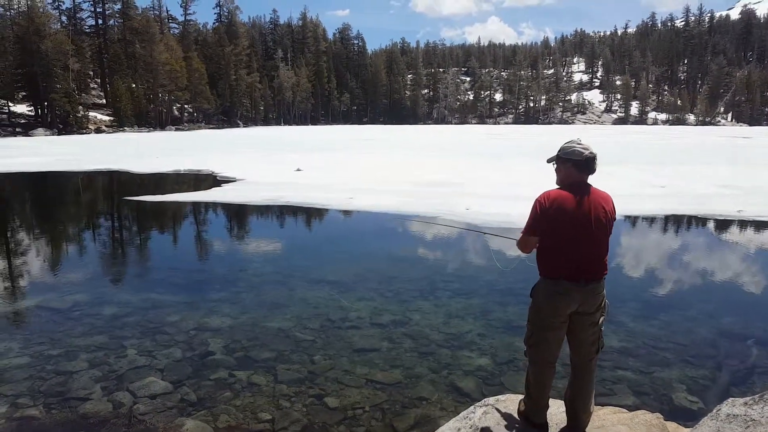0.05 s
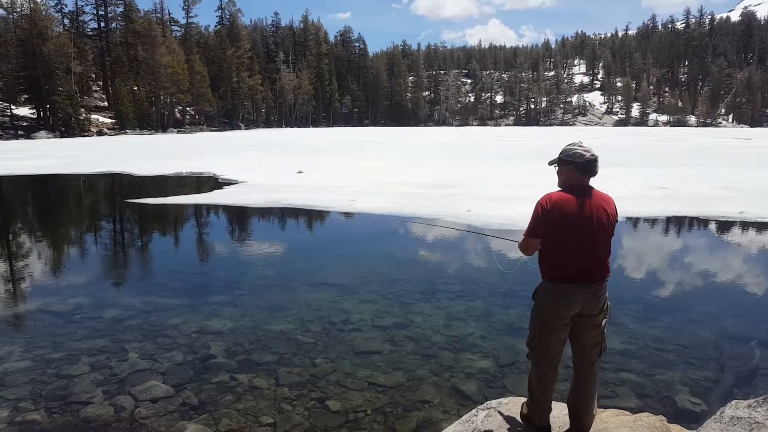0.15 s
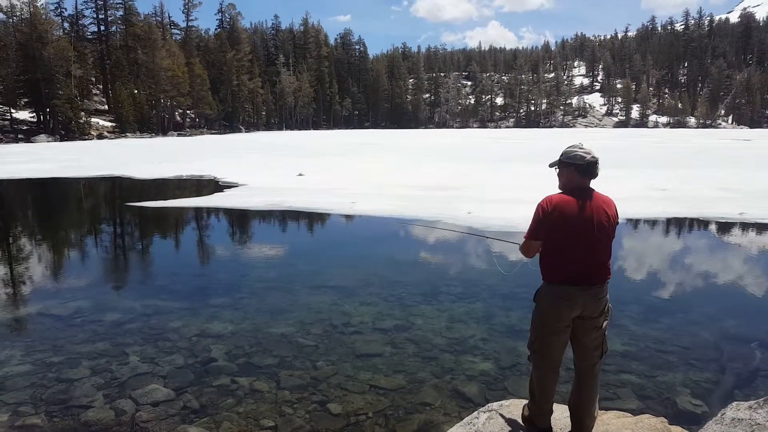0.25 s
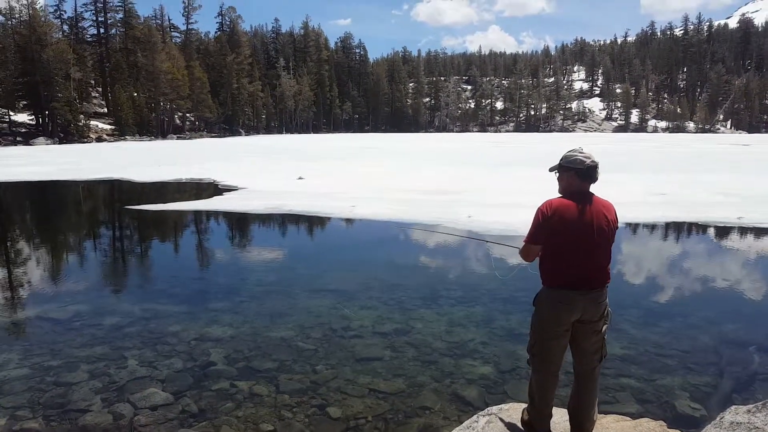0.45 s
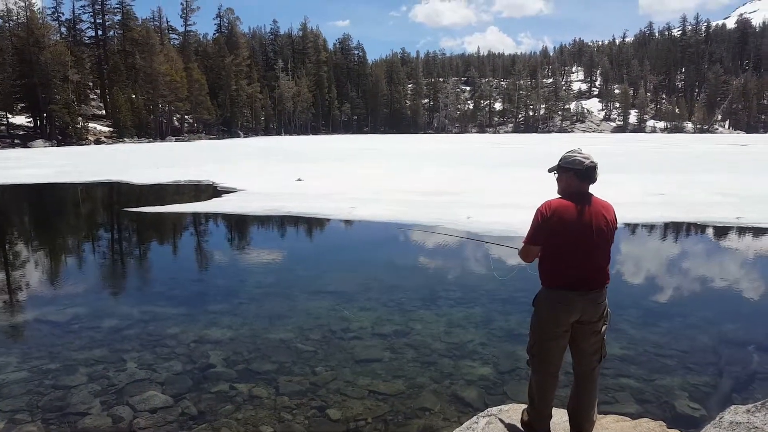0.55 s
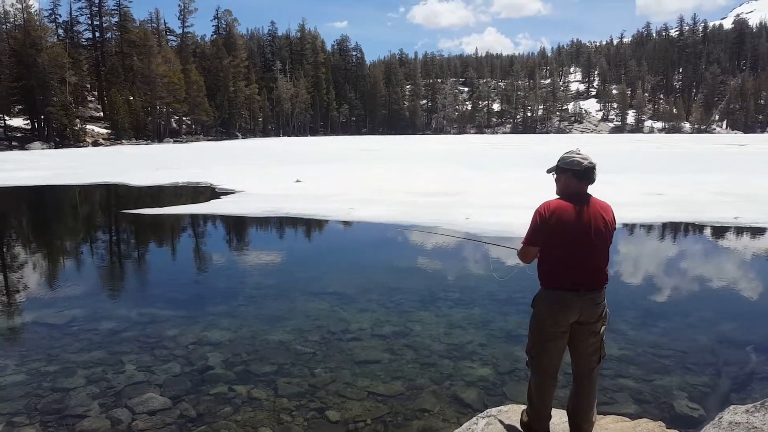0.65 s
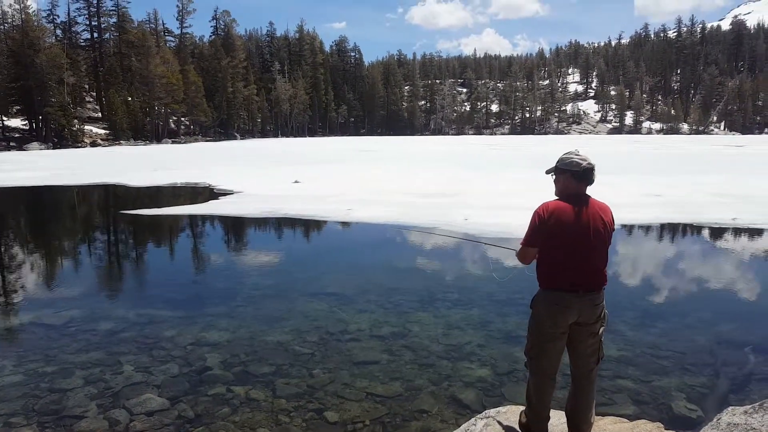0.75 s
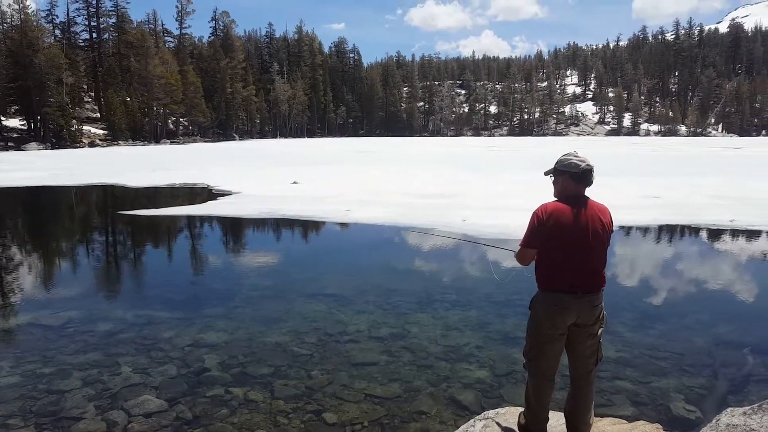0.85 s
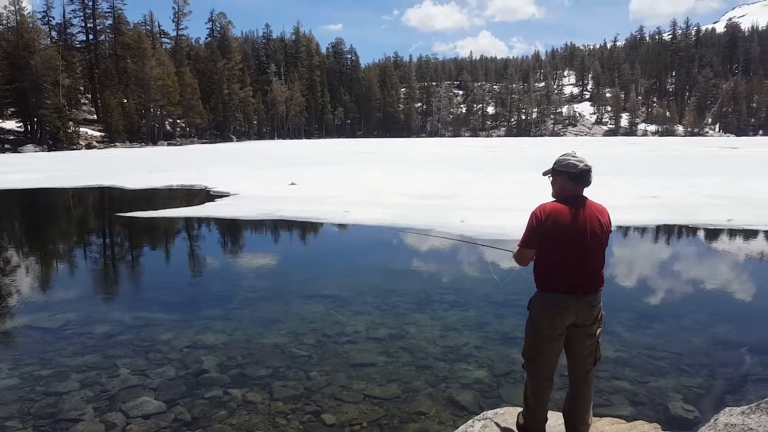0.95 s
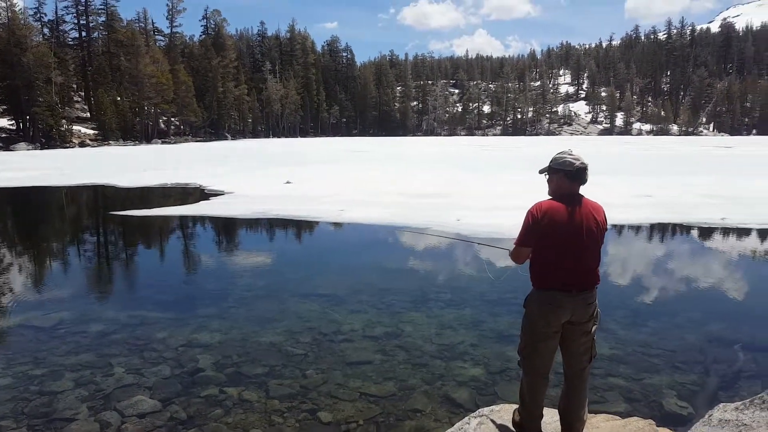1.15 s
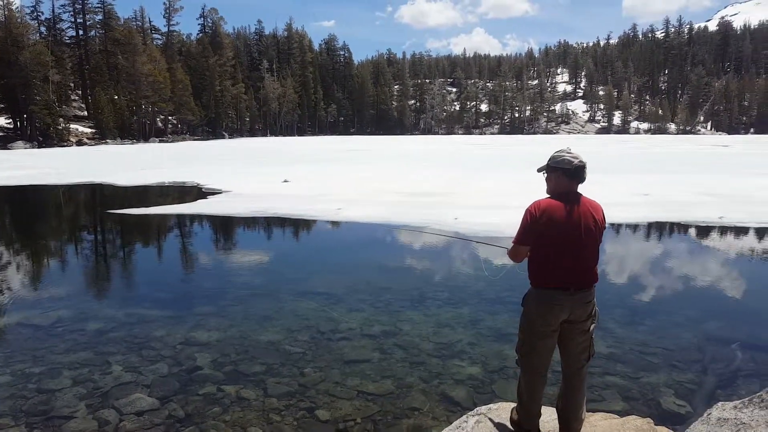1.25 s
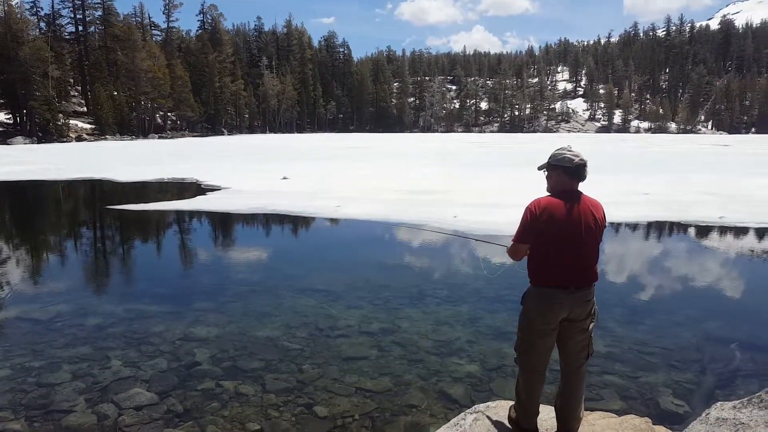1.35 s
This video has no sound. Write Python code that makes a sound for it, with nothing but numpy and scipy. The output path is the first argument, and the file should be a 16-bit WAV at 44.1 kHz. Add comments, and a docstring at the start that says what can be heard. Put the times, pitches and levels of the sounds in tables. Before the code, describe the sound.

Light, flickering wind blows on a hand-held camera's microphone beside a still lake, mostly at right, over soft hiss and a faint, thin, steady whine. At 0.24 s a finger knocks the casing with a short, crackly thump. Low buffeting gusts follow from 0.3 s, small ticks from 0.66 s. Around 0.93-1.09 s the grip rubs with soft bumps and a tiny squeak; fainter rubbing returns near 1.24-1.4 s.

```python
"""A hand-held camera by a still mountain lake, heard at its left and right microphone ports, mostly the right.
Noise hiss, low air, a thin sine whine and a flickering rush of wind run throughout.
Near 0.24 s a finger knocks the casing: short forces ring the body modes under a crackle of noise.
Lumpy buffeting follows the gusts from 0.3 s; from 0.66 s bright noise ticks snap.
From 0.93 s the grip slides: slips ring the casing, with soft bumps and one short squeak near 1.06 s."""
import sys
import numpy as np
from scipy import signal
from scipy.fft import rfft, irfft
from scipy.io import wavfile

SR = 44100
rng = np.random.default_rng(int(sys.argv[2]) if len(sys.argv) > 2 else 0)


def to_wav(sig):
    """Store sig (one row per channel, or 1-D mono) as 16-bit WAV at the path in sys.argv[1].

    Samples outside -1..1 are clipped; the rate is SR.
    """
    pcm = np.clip(np.atleast_2d(sig), -1, 1) * 32767
    pcm = np.round(pcm).astype(np.int16)
    wavfile.write(sys.argv[1], SR, pcm.T)  # frames by channels


N = 61739


def amp(db):
    """Decibels to linear gain."""
    return 10 ** (np.asarray(db) / 20)


def rms_one(x):
    """Scale a sound to an RMS of 1."""
    return x / np.sqrt(np.mean(x ** 2) + 1e-20)


def right(x, left_db):
    """Place a sound in the right port, with the left port at left_db relative to it."""
    return np.array([amp(left_db) * x, x])


def swell(start_s, length_s):
    """A half-sine bump of height 1."""
    progress = (np.arange(N) / SR - start_s) / length_s
    return np.sin(np.pi * np.clip(progress, 0, 1))


def level_curve(time_s, level_db):
    """Gain gliding in dB between points: practically silent before the first, held after the last."""
    return amp(np.interp(np.arange(N) / SR, time_s, level_db, left=-120))


def drift(rate_hz):
    """Slow random wander of RMS 1: white noise through a two-pole lowpass."""
    r = np.exp(-2 * np.pi * rate_hz / SR)
    noise = rng.standard_normal(N + SR)
    # the first second lets the filter settle
    return rms_one(signal.lfilter([1], [1, -2 * r, r * r], noise)[SR:])


def coloured(spectrum, patchy_db=0, rate_hz=12):
    """Noise shaped to a spectrum in dB per Hz; patchy_db makes each octave flicker on its own."""
    hz = np.maximum(np.arange(N // 2 + 1) * SR / N, 1)
    points_hz, points_db = np.transpose(spectrum)
    curve_db = np.interp(np.log(hz), np.log(points_hz), points_db, left=-200, right=-200)
    # the root brings white noise to unit power per Hz
    shaped = rfft(rng.standard_normal(N)) * amp(curve_db) * np.sqrt(SR / 2)
    if not patchy_db:
        return irfft(shaped, N)
    octave = np.log2(hz / 30)
    out = np.zeros(N)
    for k in range(-1, 10):
        # triangular octave bands that overlap and add up to 1
        band = irfft(shaped * np.clip(1 - abs(octave - k), 0, 1), N)
        out += amp(patchy_db * drift(rate_hz)) * band
    return out


def ring(clicks, hz, t60_s):
    """Two-pole resonator: a unit click starts a sine of height 1 that falls 60 dB in t60_s."""
    r = amp(-60 / (t60_s * SR))
    w = 2 * np.pi * hz / SR
    return signal.lfilter([0, np.sin(w)], [1, -2 * r * np.cos(w), r * r], clicks + 1e-18)


def push(start_s, size, contact_ms):
    """A half-sine contact force whose samples add up to size."""
    force = swell(start_s, contact_ms / 1000)
    return size * force / force.sum()


# modes of the camera body: pitch_hz [Hz], level_db [dB], t60_s [s]
BODY_MODES = [(85.7, -29.5, 0.093), (140.4, -4.5, 0.02), (292, -1.5, 0.013), (525, -19, 0.021),
              (624, -15.5, 0.051), (800, -14, 0.018), (1110, -28.5, 0.058), (1870, -45, 0.025)]


def body(force):
    """A force rings every mode of the camera body."""
    return sum(amp(level_db) * ring(force, pitch_hz, t60_s) for pitch_hz, level_db, t60_s in BODY_MODES)


# hiss and distant air, independent in the two ports: pitch_hz [Hz], level_db_per_hz [dB per Hz]
HISS = [(20, -85.5), (45, -94), (100, -96.5), (180, -100), (300, -102), (1000, -106), (3000, -112),
        (5000, -117), (7000, -121), (9500, -124), (12000, -119.5), (14000, -117), (17000, -115)]
# low air sound common to both ports: pitch_hz [Hz], level_db_per_hz [dB per Hz]
SHARED_AIR = [(25, -108), (70, -99), (170, -96), (350, -108), (800, -125)]


def air():
    """Steady noise: a separate hiss for each port over one shared low air sound."""
    hiss = np.array([coloured(HISS), coloured(HISS)])
    return hiss + coloured(SHARED_AIR)


WHINE_HZ, WHINE_WANDER_HZ = 1365.5, 2.7
WHINE_DB = -72  # RMS


def whine():
    """A thin sine whose pitch wavers slightly at random."""
    hz = WHINE_HZ + WHINE_WANDER_HZ * drift(7.3)
    tone = np.sqrt(2) * np.sin(2 * np.pi * np.cumsum(hz) / SR)
    return right(amp(WHINE_DB) * tone, -42.5)


# steady rush of air in the right port: pitch_hz [Hz], level_db_per_hz [dB per Hz]
RUSH = [(20, -83), (42, -78.5), (65, -90), (150, -92), (300, -97.5), (600, -94.5), (1000, -94.5),
        (1400, -95), (1900, -100), (2600, -105), (3200, -113), (5000, -119), (9000, -130)]
RUSH_PATCHY_DB = 2.05


def rush():
    """Wind noise in the right port only, each octave flickering around a constant level."""
    flow = coloured(RUSH, RUSH_PATCHY_DB)
    return np.array([np.zeros(N), flow])


# gust strength at the right port: time_s [s], level_db [dB]
GUSTS = [(.3, -74.5), (.45, -72), (.5, -69.5), (.55, -81), (.64, -65), (.68, -68), (.74, -75), (.81, -82),
         (.835, -56), (.875, -56), (.9, -82), (.955, -75), (.97, -57.5), (1.01, -62), (1.055, -51.5),
         (1.078, -68), (1.16, -78), (1.185, -65), (1.22, -75), (1.265, -69.5), (1.285, -57.5), (1.31, -67),
         (1.33, -68), (1.4, -62)]
# tone of the buffeting: pitch_hz [Hz], level_db [dB, relative]
BUFFET_TONE = [(25, -17), (70, 5), (130, -1.5), (250, -15.5), (500, -19), (1000, -49)]
BUFFET_LUMPY_DB, BUFFET_LEFT_DB = 2, -14


def buffeting():
    """Lumpy low wind noise that follows the gusts, independent in each port and weaker at left."""
    gust = level_curve(*np.transpose(GUSTS))
    left_rumble, right_rumble = [
        gust * rms_one(coloured(BUFFET_TONE, BUFFET_LUMPY_DB, 18)) for _ in range(2)]
    return np.array([amp(BUFFET_LEFT_DB) * left_rumble, right_rumble])


# soft bumps of the grip: start_s [s], strength_db [dB], left_minus_right_db [dB]
BUMPS = [(0.968, -43, -26), (1.054, -35.5, -17), (1.0605, -52.5, 15), (1.175, -39, -39), (1.287, -36, -31)]
BUMP_CONTACT_MS = 4.3


def bumps():
    """Soft pushes of the hand ring the body modes."""
    out = np.zeros((2, N))
    for start_s, strength_db, left_minus_right_db in BUMPS:
        force = push(start_s, -amp(strength_db), BUMP_CONTACT_MS)
        out += right(body(force), left_minus_right_db)
    return out


# ticks of the casing: start_s [s], peak_db [dB], centre_hz [Hz], low_ring_db [dB]
TICKS = [(0.656, -58.5, 6500, -84), (.742, -58, 4800, -84), (.896, -62, 7000, -82), (1.041, -62, 6000, -65),
         (1.076, -51.5, 5500, -50), (1.097, -60, 4960, -75), (1.117, -56, 5200, -84),
         (1.125, -58, 6400, -80), (1.147, -55, 4800, -94), (1.156, -58, 6500, -83), (1.216, -59, 4830, -81),
         (1.246, -54, 3930, -78), (1.296, -65, 5000, -75), (1.3231, -48.5, 4540, -37),
         (1.3848, -57, 5700, -79)]
TICK_T60_S, TICK_WIDTH_OCTAVES, TICK_LEFT_DB = .007, 1.0, -18
TICK_SNAP = 4  # height of the first push, in units of the noise's RMS at its start
TICK_RING_HZ, TICK_RING_T60_S = 820, 0.0089


def ticks():
    """A first push and dying noise pass a band filter; a click rings the casing lower down."""
    bursts, clicks = np.zeros(N + SR), np.zeros(N)
    t = np.arange(SR // 50) / SR
    for start_s, peak_db, centre_hz, low_ring_db in TICKS:
        noise = rng.standard_normal(len(t)) * amp(-60 * t / TICK_T60_S)
        snap = TICK_SNAP * (t == 0)
        edges_hz = centre_hz * 2. ** (TICK_WIDTH_OCTAVES * np.array([-.5, .5]))
        edges_hz = np.clip(edges_hz, 10, .45 * SR)
        band = signal.butter(2, edges_hz, "band", fs=SR, output="sos")
        burst = signal.sosfilt(band, noise + snap)
        start = int(start_s * SR)
        bursts[start:][:len(t)] += amp(peak_db) * burst / abs(burst).max()
        clicks[start] = amp(low_ring_db)
    low_ring = ring(clicks, TICK_RING_HZ, TICK_RING_T60_S)
    return right(bursts[:N] + low_ring, TICK_LEFT_DB)


SQUEAK_PEAK_S, SQUEAK_HALF_LENGTH_S, SQUEAK_DB = 1.058, .007, -56
SQUEAK_HZ, SQUEAK_T60_S = 2600, .012


def squeak():
    """Noise through one narrow resonance, swelling briefly within the slide."""
    tone = rms_one(ring(rng.standard_normal(N), SQUEAK_HZ, SQUEAK_T60_S))
    shape = swell(SQUEAK_PEAK_S - SQUEAK_HALF_LENGTH_S, 2 * SQUEAK_HALF_LENGTH_S)
    return amp(SQUEAK_DB) * shape * tone


# two strokes of the sliding grip, one list each: time_s [s], level_db [dB], favoured_hz [Hz]
SLIDE_STROKES = [
    [(.93, -64.5, 450), (.965, -60, 450), (1.0, -53, 485), (1.018, -54, 1530), (1.032, -48.5, 720),
     (1.046, -50.5, 1180), (1.055, -52, 2580), (1.063, -49, 1030), (1.076, -58.5, 1140), (1.086, -72, 1210)],
    [(1.24, -67, 596), (1.27, -62, 587), (1.298, -56.5, 800), (1.314, -60, 875), (1.34, -62, 990),
     (1.39, -65, 600)],
]
# resonances of the casing under a sliding finger: pitch_hz [Hz], level_db [dB, relative], t60_s [s]
SKIN_RESONANCES = [(450, -7, 0.028), (757, -2, 0.015), (1026, -6.5, 0.0067), (1150, 0, 0.015),
                   (1280, -5, 0.012), (1600, -8, 0.028), (2320, -10.5, 0.0039), (2880, -7, 0.002),
                   (3800, -17, 0.0017), (5200, -10, 0.0013), (7000, -19.5, 0.0029)]
SLIPS_PER_S, SLIP_SPREAD_DB = 4000, 3
FAVOUR_DB, FAVOUR_OCTAVES = 9.5, 0.23
SLIDE_LEFT_DB = -24


def slide():
    """Dense uneven slips, each dealt to one resonance; the moving finger favours one region."""
    time_s, level_db, favoured_points_hz = np.transpose(SLIDE_STROKES[0] + SLIDE_STROKES[1])
    gain = level_curve(time_s, level_db)  # stays faintly open between the strokes
    favoured_hz = np.interp(np.arange(N) / SR, time_s, favoured_points_hz)

    happens = rng.random(N) < SLIPS_PER_S / SR
    size = amp(SLIP_SPREAD_DB * np.minimum(rng.exponential(1, N), 3))
    slips = happens * size * rng.choice([-1, 1], N)
    dealt = rng.integers(0, len(SKIN_RESONANCES), N)

    out = squeak()
    for k, (pitch_hz, skin_db, t60_s) in enumerate(SKIN_RESONANCES):
        near = np.exp(-(np.log2(pitch_hz / favoured_hz) / FAVOUR_OCTAVES) ** 2)
        tone = rms_one(ring(slips * (dealt == k), pitch_hz, t60_s))
        out += gain * amp(skin_db + FAVOUR_DB * (near - 1)) * tone
    return right(out, SLIDE_LEFT_DB)


# tone of the crackle: pitch_hz [Hz], level_db [dB, relative]
CRACKLE_TONE = [(200, -5), (600, 5), (1500, -5.5), (2500, -13), (3500, -28.5), (5500, -34), (7700, -34.5),
                (9500, -48.5)]
CRACKLE_START_S, CRACKLE_LENGTH_S, CRACKLE_DB = .2362, 0.017, -39.5


def crackle():
    """Skin peels over the casing during the knock: a short swell of coloured noise."""
    shape = swell(CRACKLE_START_S, CRACKLE_LENGTH_S)
    return amp(CRACKLE_DB) * shape * rms_one(coloured(CRACKLE_TONE))


# contacts of the knock: start_s [s], strength_db [dB], direction [only its sign counts], contact_ms [ms]
KNOCK_CONTACTS = [(0.2375, -16, 1, 0.43), (0.2379, -10, -1, 1.96), (0.2406, -14, 1, 1.73),
                  (0.2434, -29.5, 1, 0.26), (.245, -24, 0.85, 0.17), (0.2481, -28, 1, 1.02),
                  (.256, -26.5, 1, 4.6)]
KNOCK_LEFT_DB = -46


def knock():
    """A finger lands, presses and rebounds; its forces ring the body under the crackle."""
    force = np.zeros(N)
    for start_s, strength_db, direction, contact_ms in KNOCK_CONTACTS:
        force += push(start_s, np.sign(direction) * amp(strength_db), contact_ms)
    return right(crackle() + body(force), KNOCK_LEFT_DB)


def scene():
    """All sources summed at the two ports."""
    background = air() + whine() + rush() + buffeting()
    handling = bumps() + ticks() + slide() + knock()
    return background + handling


LOW_CUT_HZ, TREBLE_EDGE_HZ = 59.6, 15740
OFFSET = -.0004  # constant shift of both ports, full scale 1


def record(dry):
    """Cut the lowest bass, add a small constant offset, then cut the top steeply."""
    low_cut = signal.butter(4, LOW_CUT_HZ, "high", fs=SR, output="sos")
    top_cut = signal.ellip(14, .5, 70, TREBLE_EDGE_HZ, fs=SR, output="sos")
    x = signal.sosfilt(low_cut, dry) + OFFSET
    return signal.sosfilt(top_cut, x)


dry = scene()
out = record(dry)
to_wav(out)
```